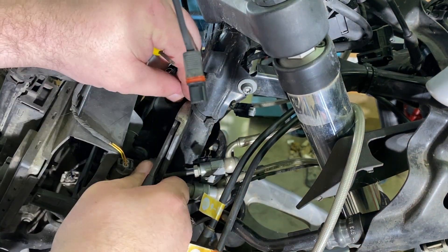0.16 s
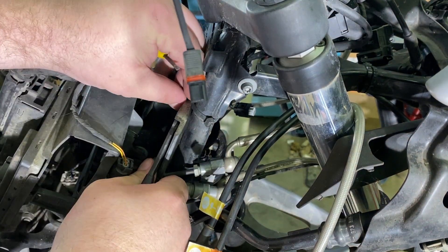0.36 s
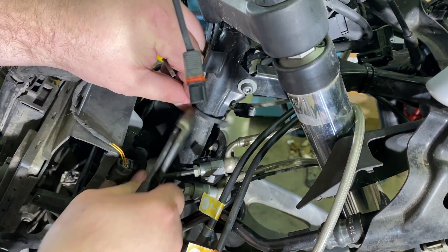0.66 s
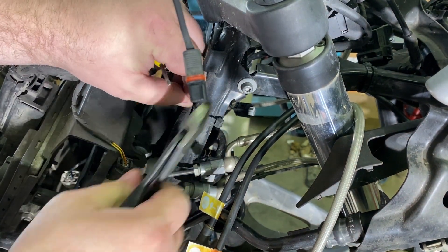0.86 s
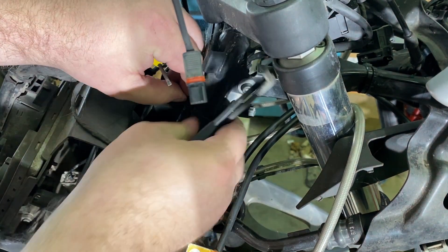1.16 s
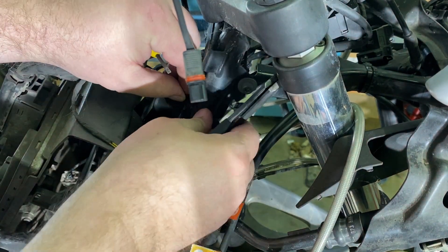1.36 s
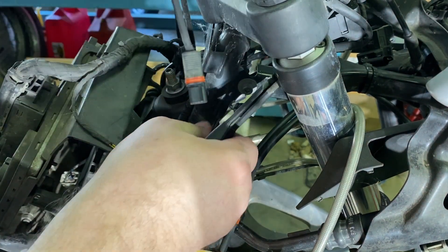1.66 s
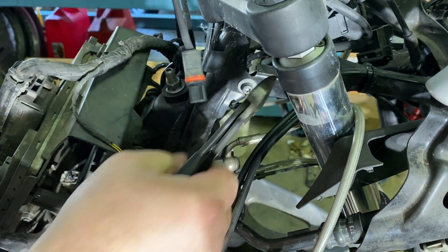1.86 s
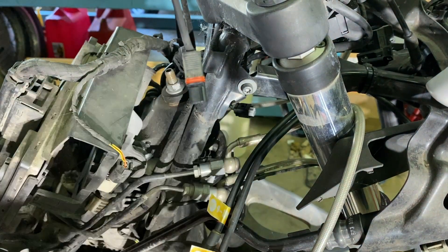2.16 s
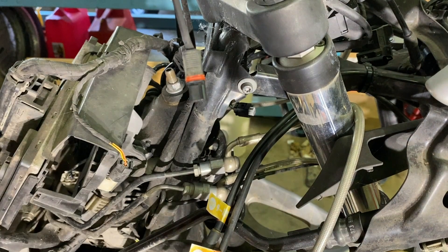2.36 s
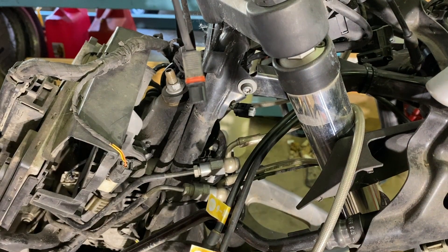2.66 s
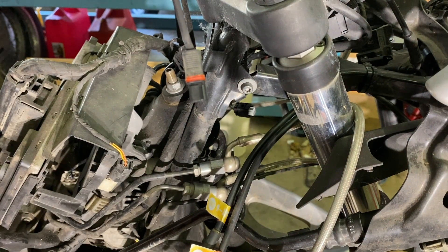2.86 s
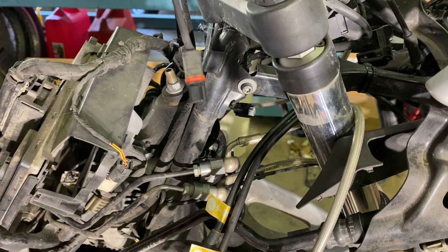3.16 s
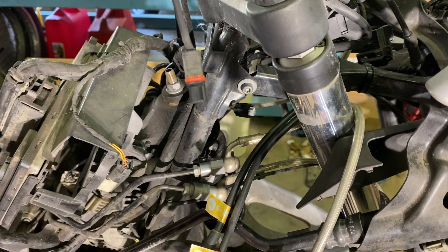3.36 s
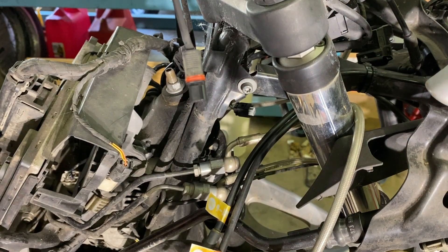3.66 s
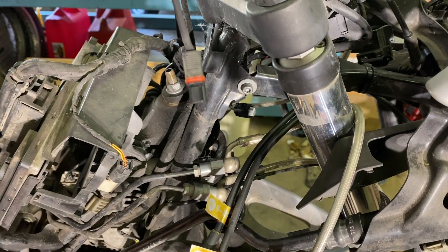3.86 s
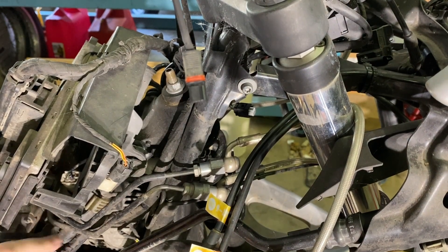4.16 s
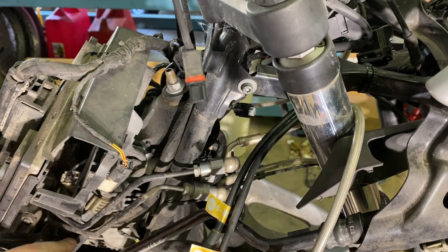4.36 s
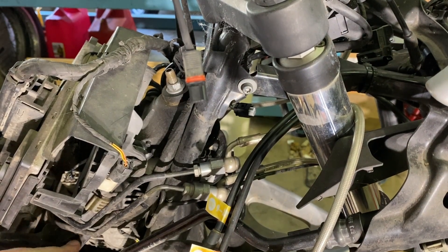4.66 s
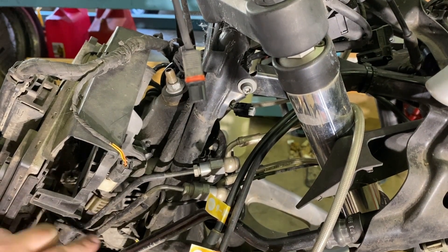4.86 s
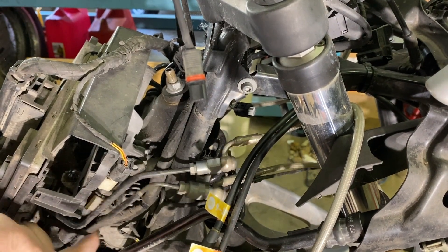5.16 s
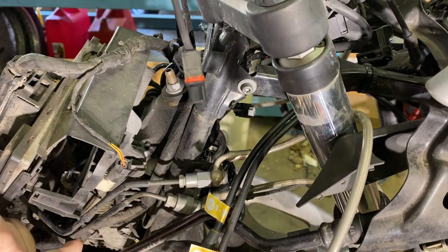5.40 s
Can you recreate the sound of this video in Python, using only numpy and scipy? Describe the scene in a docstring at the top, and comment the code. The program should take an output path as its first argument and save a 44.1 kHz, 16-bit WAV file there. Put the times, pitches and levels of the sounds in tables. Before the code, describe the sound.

A loud, dry snap of cutters through plastic close by, then a second, roomier snap farther off, followed by light tool and cable handling over low hum.

```python
"""Plastic cable ties are cut in the engine bay of a car, in a reverberant workshop with a low hum and a thin hiss.
The first tie creaks and snaps right by the microphone, whose limiter ducks and recovers; struck modes and noise
bursts make the cutters tick, knock and bump a housing. A second snap rings through the room from further off, its
tie end bounces, then tools and cables are handled: trains of slips rub and scrape, steel is set down, a drone rises."""
import sys
import numpy as np
from scipy import signal
from scipy.fft import rfft, irfft, next_fast_len
from scipy.io import wavfile
from scipy.ndimage import uniform_filter1d, minimum_filter1d

SR = 44100
rng = np.random.default_rng(int(sys.argv[2]) if len(sys.argv) > 2 else 0)


def to_wav(sig):
    """Store sig (one row per channel, or 1-D mono) as 16-bit WAV at the path in sys.argv[1].

    Samples outside -1..1 are clipped; the rate is SR.
    """
    pcm = np.clip(np.atleast_2d(sig), -1, 1) * 32767
    pcm = np.round(pcm).astype(np.int16)
    wavfile.write(sys.argv[1], SR, pcm.T)  # frames by channels


N = 243859
TIME = np.arange(N) / SR   # s

# Table levels are relative: each source adds its own offset. Colours are spectra: hz, level_db
# close cut: the tie parts, the jaws meet and an early reflection returns: start_s, level_db, t60_s
CLOSE_CUT_HITS = [(.3828, 13, .005), (.3834, 12.5, .004), (0.3855, 2, .012), (.394, -17, .05)]
# small hard contacts of jaws and tie ends: hz, level_db
TICK_SPECTRUM = [(200, -40), (900, -13.5), (2500, -15), (5000, -9), (7500, -5), (10000, 0.5), (14000, -5),
                 (16000, -7.5)]
TICK_RING_T60_S = .016
# broad crack of plastic parts and bounces: hz, level_db
CRACK_SPECTRUM = [(300, -4.5), (1200, -4.5), (2200, -3), (3600, -3), (6000, -11), (9400, -5), (11000, -18),
                  (16000, -20)]
# strokes of the hands over cables: start_s, length_s, body_db, hiss_db
HAND_STROKES = [(0, .18, -64, -70), (.87, .65, -59.5, -70), (1.61, .17, -61, -58), (3.63, .25, -50.5, -57),
                (3.9, .33, -52.5, -65), (4.44, .2, -66, -71), (4.68, .23, -52, -60), (5.02, .19, -52, -60)]


def from_db(db):
    """Decibels to gain."""
    return 10 ** (np.asarray(db) / 20)


def rms_one(x):
    """Scale to unit rms."""
    return x / np.sqrt(np.mean(x ** 2) + 1e-20)


def at_hz(points, hz):
    """Read a table on a log-frequency axis."""
    f, value = np.transpose(points)
    return np.interp(np.log(np.maximum(hz, 1)), np.log(f), value)


def tint(x, colour, tilt_db=0, hinge_hz=3000):
    """Give a sound a spectrum, tilted per octave above the hinge; rms 1."""
    size = next_fast_len(x.shape[-1])
    hz = np.fft.rfftfreq(size, 1 / SR)
    tilt = tilt_db * np.log2(np.maximum(hz / hinge_hz, 1))
    gain = from_db(at_hz(colour, hz) + tilt) * (hz > 10)
    return rms_one(irfft(rfft(x, size) * gain, size)[..., :x.shape[-1]])


def drift(hz, size=N):
    """Slow random wander of spread 1: random knots, 2 * hz per second, joined by straight lines."""
    knots = rng.standard_normal(int(N / SR * hz * 2) + 2)
    wander = np.interp(TIME[:size] * hz * 2, np.arange(len(knots)), knots)
    return wander * np.sqrt(3 / 2)   # makes up for the spread lost between knots


def pan(db):
    """Channel gains for a left-minus-right level."""
    return from_db(np.array([[db], [-db]]) / 2)


def spread(mid, side, side_db):
    """Left and right from a common and an opposed part; rms 1."""
    return rms_one(mid + from_db(side_db) * side * np.array([[1], [-1]]))


def from_right(x):
    """The sound reaches the right port of the microphone 13 samples before the left."""
    return np.array([np.roll(x, 13), x])


def at(s, sound):
    """A short sound placed at its moment."""
    start = int(round(s * SR))
    return np.pad(sound, (start, N))[:N]


def envelope(start, length, attack, release):
    """Straight rise, hold to the end of the length, exponential release; all in seconds."""
    t = TIME - start
    rise = np.clip(t / max(attack, .001), 0, 1)
    return rise * np.exp(-np.maximum(t - length, 0) / max(release, .001))


def stroke(start, length, db):
    """The push of one hand movement."""
    return from_db(db) * envelope(start, length, attack=.06, release=.08)


def burst(colour, t60, tilt_db=0, size=8192):
    """Countless crowded modes struck at once and dying together, as decaying noise."""
    decay = from_db(-60 * TIME[:size] / max(t60, .001))
    noise = tint(rng.standard_normal(size), colour, tilt_db)
    return rms_one(noise * decay) * np.sqrt(np.mean(decay ** 2))


def click(colour, tilt_db=0, size=512):
    """One smooth pulse of unit energy."""
    pulse = tint(signal.unit_impulse(size), colour, tilt_db)
    return np.roll(pulse, size // 16) / np.sqrt(size)


def ring(modes, chatter, chatter_hz=110, size=32768):
    """Decaying sines of a struck body, in alternating sign; loose contact makes each one's phase waver."""
    t = TIME[:size]
    x = 0
    for k, (hz, db, t60) in enumerate(modes):
        phase = 2 * np.pi * hz * t + chatter * drift(chatter_hz, size)
        x = x + (-1) ** k * from_db(db - 60 * t / t60) * np.sin(phase)
    return x


def squeal(hz, waver, waver_hz):
    """A stick-slip tone of unsteady phase; rms 1."""
    return rms_one(np.sin(2 * np.pi * hz * TIME + waver * drift(waver_hz)))


def catches(per_s, uneven_db):
    """Tiny contacts at random moments, of uneven strength and either sign."""
    touched = rng.random(N) < per_s / SR
    strength = from_db(uneven_db * np.clip(rng.standard_normal(N), -2, 2))
    return touched * rng.choice([-1, 1], N) * strength


def friction(colour, grain_db, grain_hz=180):
    """Rubbing is a train of tiny slips of uneven strength; rms 1."""
    slips = spread(*rng.standard_normal((2, N)), -1.5) * from_db(grain_db * drift(grain_hz))
    return tint(slips, colour)


def room(x, near_db, hall_db, near_t60=.049, side_db=-5, size=44100):
    """Quick reflections off the car's panels, and the workshop's tail, which dies first in the treble."""
    # decay of the workshop: hz, t60_s
    hall_t60 = [(150, .6), (800, 0.72), (2000, 0.78), (5500, .8), (9000, .6), (15000, .42)]
    t, edges = TIME[:size], np.geomspace(100, 17000, 12)
    white = spread(*rng.standard_normal((2, size)), side_db)
    hall = 0
    for low, high in zip(edges, edges[1:]):
        band_pass = signal.butter(2, [low, high], "band", fs=SR, output="sos")
        band = signal.sosfilt(band_pass, rng.standard_normal((2, size)))
        decay = from_db(-60 * t / at_hz(hall_t60, np.sqrt(low * high)))
        # spread() levels the bands; the root of the bandwidth makes them white again
        hall = hall + spread(*band, side_db) * np.sqrt(high - low) * decay
    near = white * from_db(-60 * t / near_t60) * (t > .001)
    response = from_db(near_db) * rms_one(near) + from_db(hall_db) * rms_one(hall * (t > .006))
    return signal.fftconvolve(x[None], response / np.sqrt(size), axes=1)[:, :N]


def close_cut(creak_db=-28, creak_hz=6300, creak_s=.005, noise_db=-21, noise_s=.0022, spread_db=22):
    """The blades squeak into the stretched nylon, a brief noise swells into the snap, and the tie parts."""
    # the snap at the microphone: hz, level_db
    snap_colour = [(300, -33), (1100, -35), (1800, -13), (2700, -40), (4500, -21), (6300, -12), (8200, -1),
                   (10300, -13.5), (14000, -12), (16000, -12)]
    # the cut as it spreads sideways into the room: hz, level_db
    sideways_colour = [(300, -32), (1200, -27), (1600, -4.5), (2050, -.5), (2500, -18), (4300, -10),
                       (6300, -7.5), (8200, 3.5), (10500, -6), (14000, -4), (16000, -24)]
    cut_s = CLOSE_CUT_HITS[0][0]
    snap = sum(at(s, from_db(db) * burst(snap_colour, t60)) for s, db, t60 in CLOSE_CUT_HITS)
    before = cut_s - TIME
    creak = from_db(creak_db) * squeal(creak_hz, waver=1.0, waver_hz=203) * np.exp(-np.abs(before) / creak_s)
    noise = from_db(noise_db) * tint(rng.standard_normal(N), snap_colour) * np.exp(-np.abs(before) / noise_s)
    direct = snap + (creak + noise) * (before > 0)
    outgoing = at(cut_s, from_db(spread_db) * click(sideways_colour))
    return pan(2.5) * (from_right(direct) + room(outgoing, near_db=-15, hall_db=-20.5))


def overload_thump(thump_db=.5, start_hz=340, end_hz=56, glide_s=.0031, attack_s=.0007, decay_s=.011, delay_s=.0021):
    """The microphone, overloaded by the snap, answers with one thud that drops in pitch."""
    t = TIME[:SR // 4]
    phase = 2 * np.pi * np.cumsum(end_hz + (start_hz - end_hz) * np.exp(-t / glide_s)) / SR
    shape = (1 - np.exp(-t / attack_s)) * np.exp(-t / decay_s)
    return at(CLOSE_CUT_HITS[0][0] + delay_s, from_db(thump_db) * np.sin(phase) * shape)


def far_snap(scatter_db=-1, near_db=-1, hall_db=-2.3, panel_db=5, jaws_db=5, bounce_ring_db=9, uneven_db=3):
    """A short crack rings the cutters and nearby panels; the tie end rattles and bounces; much room."""
    # the snap: start_s, level_db, t60_s, tilt_db_per_octave
    s, db, t60, tilt = (3.141, -11, .003, 4)
    # its spectrum: hz, level_db
    snap_colour = [(150, -12.5), (400, -2), (620, -4.5), (800, 5), (1000, -13.5), (1800, 1.5), (2800, -6.5),
                   (5200, 2), (7500, -4), (10200, -2), (13500, -8), (16000, -18)]
    # the cut-off end skitters over panels: start_s, level_db
    bounces = [(3.316, -18), (3.417, -22), (3.4445, -22)]
    # panels struck by the snap and by each bounce: hz, level_db, t60_s
    panels = [(371, -55, .3), (517, -58, .25), (627, -56, .4), (792, -50, .36), (874, -58, .5),
              (1090, -52, .12), (1168, -59, .45), (1470, -60, .27), (1620, -52, .16), (1674, -60, .4),
              (1814, -54, .3), (2000, -54, .16), (2331, -60, .35)]
    # the steel cutters ring after the snap: hz, level_db, t60_s
    jaws = [(3490, -45, .15), (3887, -59, .45), (4673, -46, .2), (4759, -53, .45), (4802, -47, .18),
            (5038, -56, .5), (5225, -59, .5), (5620, -53, .4), (5730, -47, .17), (6189, -51, .3),
            (9702, -53, .2), (10182, -52, .22)]

    crack = at(s, from_db(db) * burst(snap_colour, t60, tilt))

    # the end rattles briefly where it was cut, before it bounces
    rattle = from_db(-38) * catches(per_s=55, uneven_db=3) * envelope(s, .02, .02, .11)
    rattle = signal.fftconvolve(rattle, burst(snap_colour, t60=.014))[:N]

    landings = sum(at(when, from_db(hit_db) * click(CRACK_SPECTRUM)) for when, hit_db in bounces)
    outgoing = at(s, from_db(scatter_db) * click(snap_colour)) + landings

    panel_ring = from_db(panel_db) * ring(panels, chatter=.3, chatter_hz=30)
    jaw_ring = from_db(jaws_db) * ring(jaws, chatter=.3, chatter_hz=40)
    ringing = at(s, panel_ring + jaw_ring)
    for when, hit_db in bounces:   # each bounce lands on another spot
        modes = [(hz, mode_db + uneven_db * rng.standard_normal(), mode_t60) for hz, mode_db, mode_t60 in panels]
        hit = from_db(hit_db + bounce_ring_db) * ring(modes, chatter=.5, chatter_hz=40)
        ringing = ringing + at(when, hit)
    reflections = room(outgoing, near_db, hall_db, near_t60=.11, side_db=-4)
    return pan(4) * (from_right(crack) + rattle + ringing + reflections)


def ticks(tick_db=-10, contact_db=14):
    """Small hard contacts, nearly all treble: a sharp first touch and a brief ring."""
    # the clearest ticks of jaws and tie ends: start_s, level_db, tilt_db_per_octave
    clear_ticks = [(.0214, -44, 6), (.0814, -44, 0), (.194, -35.5, 5), (.2249, -44, 1), (.6476, -25.5, 7),
                   (.6502, -31, -6), (.7866, -37, 1), (.817, -43, -3), (.8615, -29, 4), (1.0096, -38, -4),
                   (1.429, -32, 0), (1.723, -29, -7), (1.7828, -29, 1), (1.822, -27, 1), (2.7661, -51, -12),
                   (3.4172, -42, 6), (3.4441, -36, -6), (3.6167, -34, -7.5), (3.676, -32, 5),
                   (4.2011, -18.5, 2), (4.2954, -41, -8), (4.5635, -43.5, -8), (4.5942, -44.5, -6),
                   (4.8064, -27.5, -7), (5.2267, -45, 0)]
    x = faint_ticks()
    for s, db, tilt in clear_ticks:
        x = x + at(s, from_db(db + tick_db) * burst(TICK_SPECTRUM, TICK_RING_T60_S, tilt))
        x = x + at(s, from_db(db + tick_db + contact_db) * click(TICK_SPECTRUM, tilt))
    return from_right(x) + pan(2.5) * room(x, near_db=-7, hall_db=-12.5)


def faint_ticks(per_s=9, above_hiss_db=10):
    """Tie ends and jaws catch at random, as hard as the hands brush."""
    hiss = sum(stroke(s, length, db) for s, length, _, db in HAND_STROKES)
    touches = catches(per_s, uneven_db=1) * hiss * from_db(above_hiss_db)
    return signal.fftconvolve(touches, burst(TICK_SPECTRUM, TICK_RING_T60_S))[:N]


def knocks(knock_db=-8, skirt_db=-26, contact_db=12):
    """Each cable or plastic part answers with one damped resonance and a broad crack."""
    # knocks on cables and plastic parts: start_s, level_db, body_hz, t60_s, crack_db
    parts = [(1.1124, -46, 2500, .015, 2), (1.8163, -38, 4400, .025, -12), (3.942, -38.5, 298, .055, -5),
             (4.1233, -38, 620, .03, -3), (4.2011, -33.5, 850, .04, -2.5), (4.2954, -41, 5080, .03, -7),
             (4.631, -46, 4730, .013, 3), (4.724, -39, 480, .055, -8), (4.8066, -31, 3800, .018, 5),
             (4.874, -38.5, 1070, .045, -3), (5.043, -34, 295, .035, -19), (5.158, -38.5, 786, .06, -5)]
    # brackets and clips left ringing by a touch: start_s, level_db, pitch_hz, t60_s
    brackets = [(4.1235, -35, 5000, .017), (4.125, -50.5, 915, .23), (4.125, -52, 479, .17),
                (4.8068, -32.5, 800, .032), (4.807, -35.5, 1254, .028), (5.158, -50, 2640, .07),
                (5.16, -50, 530, .12), (5.178, -50.5, 2170, .1)]
    x = 0
    for s, db, hz, t60, crack_db in parts:
        # one peak, falling off by the skirt per octave on both sides
        body = [(hz / 4, 2 * skirt_db), (hz / 2, skirt_db), (hz, 0), (hz * 2, skirt_db), (hz * 4, 2 * skirt_db)]
        crack = from_db(crack_db) * burst(CRACK_SPECTRUM, t60 * .7)
        x = x + at(s, from_db(db + knock_db) * (burst(body, t60) + crack))
        # the first hard touch
        x = x + at(s, from_db(db + knock_db + crack_db + contact_db) * click(CRACK_SPECTRUM))
    x = x + sum(at(s, ring([(hz, db, t60)], chatter=.6)) for s, db, hz, t60 in brackets)
    return pan(5.8) * (x + room(x, near_db=-3.5, hall_db=-12))


def tool_blows(clatter_db=-9.5):
    """The cutters bump a hollow housing, which clatters; later steel is set down and rings roughly."""
    # the bump: start_s, level_db
    bump_s, bump_db = (1.7157, -34)
    # modes of the housing: hz, level_db, t60_s
    housing = [(287, -22, 0.16), (506, -14, 0.17), (781, -17, .12), (942, -12, .08), (1346, -11, 0.13),
               (1497, -16, .16), (1620, -1.5, .09), (1860, -1, .045), (1960, -1, .04), (2148, -7, .06),
               (2300, -4, .028), (2848, -17, .11)]
    # its clatter: hz, level_db
    clatter_colour = [(300, -10), (1100, -7), (1700, 0), (2400, -3), (3100, -22), (8000, -35)]
    # a steel tool is set down: start_s, level_db
    clink_s, clink_db = (4.2017, -31)
    # modes of the steel: hz, level_db, t60_s
    steel = [(1330, -30, .35), (2850, -1, .035), (2930, -27, .5), (2985, -2, .035), (3050, -27, .6),
             (3580, -32, .38), (3640, -5, .033), (4380, -6.5, .03), (7400, -12, .025), (9900, -6, 0.032)]
    bump = at(bump_s, from_db(bump_db) * ring(housing, chatter=.6))
    bump = bump + at(bump_s, from_db(bump_db + clatter_db) * burst(clatter_colour, t60=.13))
    clink = at(clink_s, from_db(clink_db) * ring(steel, chatter=1.05, chatter_hz=140))
    bump_in_room = pan(2.5) * (bump + room(bump, near_db=-7, hall_db=-16))
    clink_in_room = pan(7) * (clink + room(clink, near_db=-6.5, hall_db=-19))
    return bump_in_room + clink_in_room


def scrapes(ring_db=-10, grit_db=-2, slips_per_s=1300, rasp_above_hz=6800):
    """A sliding part catches and slips; every slip is a tiny crack that rings the frame, with a fine rasp on top."""
    # slides that swell and die away: start_s, rise_s, release_s, level_db, tilt_db_per_octave, rasp_db
    slides = [(3.937, .065, .033, -44.5, 0, -20), (5.155, .012, .03, -48, -8, -3),
              (5.394, .008, .08, -59, 1, -10)]
    # grit of the slips: hz, level_db
    grit_colour = [(300, -2), (850, -7), (1800, 0), (3300, -2), (6000, -8), (9400, -9), (11000, -14),
                   (16000, -14)]
    # modes of the frame: hz, level_db, t60_s
    frame_modes = [(1320, -6, .014), (1620, -2, .016), (1890, -2, .018), (2600, -8, .012), (3060, -2, .016),
                   (4150, -3, .012)]
    high_pass = signal.butter(4, rasp_above_hz, "high", fs=SR, output="sos")
    x = 0
    for s, rise, release, db, tilt, rasp_db in slides:
        slips = catches(slips_per_s, uneven_db=4)
        grit = from_db(grit_db) * tint(slips, grit_colour, tilt)
        rasp = from_db(rasp_db) * rms_one(signal.sosfilt(high_pass, slips))
        frame = from_db(ring_db) * rms_one(signal.fftconvolve(slips, ring(frame_modes, chatter=0))[:N])
        # halved here because the root doubles the release
        shape = np.sqrt(envelope(s, rise, rise, release / 2))
        x = x + from_db(db) * shape * (grit + rasp + frame)
    return pan(4.9) * (x + room(x, near_db=-6, hall_db=-17))


def handling(body_db=-3, hiss_db=-2, sing_hz=1580):
    """Hands brush over cables and hoses, and a rubbed part sings."""
    # low part of the rustle: hz, level_db
    body_colour = [(150, 5), (300, 4), (700, -2.5), (1100, -11.5), (1700, -6.5), (2400, -10), (3500, -24)]
    # treble of the rustle: hz, level_db
    hiss_colour = [(1500, -7), (2800, -6), (4500, 1.5), (6500, -5), (9500, 3), (14000, -4), (16000, -4.5)]
    # a rubbed part sings: start_s, length_s, level_db
    sings = [(4.7, .25, -69), (5.21, .08, -65.5)]
    body_level = sum(stroke(s, length, db + body_db) for s, length, db, _ in HAND_STROKES)
    hiss_level = sum(stroke(s, length, db + hiss_db) for s, length, _, db in HAND_STROKES)
    body = body_level * friction(body_colour, grain_db=3)
    hiss = hiss_level * friction(hiss_colour, grain_db=2.5)
    sing = sum(stroke(*row) for row in sings) * squeal(sing_hz, waver=2.2, waver_hz=130)
    return pan(4.9) * (body + hiss + sing)


def workshop(air_db=-52.5, waver=.35, flutter_db=1.5, rumble_hz=220, drone_hz=79.5, drone_rise_hz_per_s=4.5):
    """Ventilation rumble, alike at both ports in the bass, with machine hum and a slowly rising drone."""
    # workshop air: hz, level_db_per_hz
    air_colour = [(20, -22), (34, -10), (47, 0), (62, 1.5), (85, -.5), (125, -7), (200, -10.5),
                  (310, -22.5), (520, -28.5), (820, -27.5), (1900, -35), (2500, -46), (4400, -55.5),
                  (6400, -42.5), (9000, -54.5), (14000, -63.5), (16000, -76)]
    # machine hum: pitch_hz, rms_db
    hum_lines = [(52, -59.5), (113.8, -58.5), (137.5, -63.5), (159.7, -61.5), (183, -67), (252, -74)]
    # a low drone sets in later on: start_s, length_s, level_db
    start, length, drone_db = (3.85, 1.5, -51)
    # rumble and hum swell or dip briefly: centre_s, half_width_s, change_db
    swells = [(.1, .35, 3.5), (1.13, .22, -7), (5.15, .3, 2.5)]

    mid, side = rng.standard_normal((2, N))
    side = signal.sosfilt(signal.butter(1, 300, "high", fs=SR, output="sos"), side)
    air = from_db(air_db) * tint(spread(mid, side, -0.5), air_colour)
    bass = signal.sosfiltfilt(signal.butter(2, rumble_hz, fs=SR, output="sos"), air)

    drone = from_db(drone_db) * envelope(start, length, attack=.25, release=.2)
    drone_cycles = np.cumsum(drone_hz + drone_rise_hz_per_s * (TIME - start)) / SR
    lines = [(hz * TIME + rng.random(), from_db(db)) for hz, db in hum_lines] + [(drone_cycles, drone)]
    hum = 0
    for cycles, gain in lines:
        tone = np.sqrt(2) * np.sin(2 * np.pi * cycles + waver * drift(3))
        hum = hum + gain * tone * from_db(flutter_db * drift(4))

    swell = from_db(sum(db * np.exp(-((TIME - s) / width) ** 2) for s, width, db in swells))
    return pan(2.4) * (air - bass + swell * (bass + hum))


def faint_hiss():
    """A thin, hollow hiss comes and goes above the rumble."""
    # its level over time: time_s, level_db
    hiss_course = [(0, -77), (.7, -71), (.9, -73), (1.42, -74), (1.9, -84), (2.2, -95), (2.72, -95),
                   (2.84, -74), (3.1, -74), (3.5, -82), (5.5, -85)]
    # its spectrum: hz, level_db
    hollow_colour = [(1200, -20), (1750, -11), (2100, 0), (2450, -13), (3100, -14), (3700, -6), (4400, -18),
                     (5000, -11), (6400, -13), (9000, -28)]
    level = from_db(np.interp(TIME, *np.transpose(hiss_course)))
    return pan(2.4) * level * tint(spread(*rng.standard_normal((2, N)), -2), hollow_colour)


def scene():
    """Everything heard at the two ports."""
    cuts = close_cut() + overload_thump() + far_snap()
    contacts = ticks() + knocks() + tool_blows()
    rubbing = scrapes() + handling()
    return cuts + contacts + rubbing + workshop() + faint_hiss()


def limiter(x, ceiling_db=-2.3, release_db_per_s=68, size=45):
    """The gain drops just ahead of a peak and climbs back steadily."""
    over = np.maximum(20 * np.log10(np.abs(x).max(axis=0) + 1e-9) - ceiling_db, 0)
    held = np.maximum.accumulate(over + release_db_per_s * TIME) - release_db_per_s * TIME
    return x * from_db(uniform_filter1d(minimum_filter1d(-held, size), size))


def record(dry, top=1.2, shared_above_hz=8000, cutoff_hz=16000):
    """Both channels share one top octave, a port's lag apart; then the limiter, rounded peaks and the band limit."""
    size = 2 * next_fast_len(N // 2 + 1)
    hz = np.fft.rfftfreq(size, 1 / SR)
    share = np.clip((hz - shared_above_hz) / 500 + .5, 0, 1)   # crossover 500 Hz wide
    treble = irfft(rfft(dry, size) * share, size)[:, :N]
    ports = dry - treble + from_right(treble[1])
    heard = top * np.tanh(limiter(ports) / top)
    return signal.sosfilt(signal.ellip(10, .1, 80, cutoff_hz, fs=SR, output="sos"), heard)


dry = scene()
out = record(dry)
to_wav(out)
```